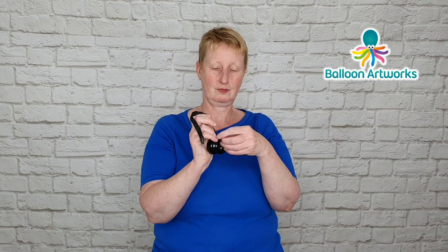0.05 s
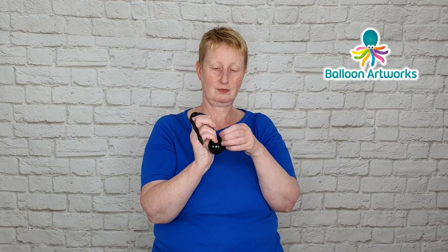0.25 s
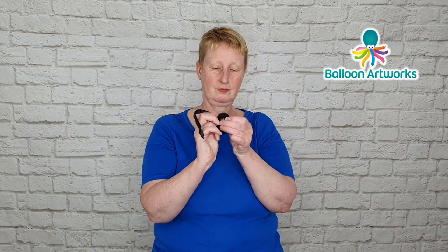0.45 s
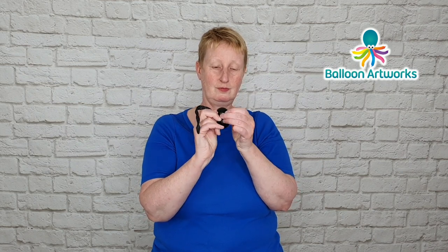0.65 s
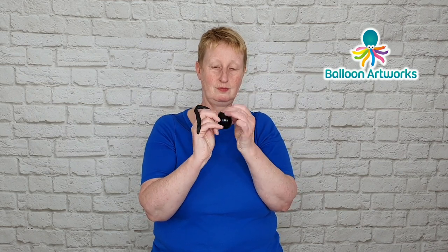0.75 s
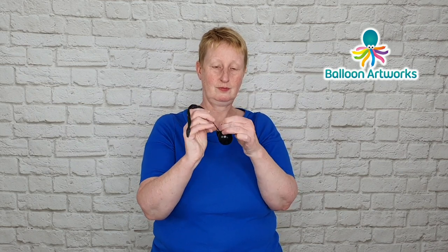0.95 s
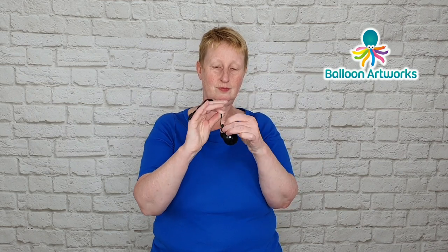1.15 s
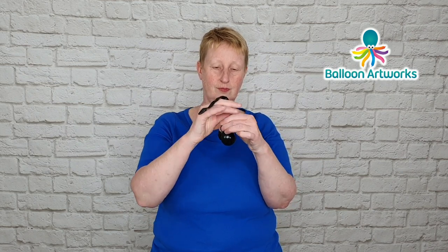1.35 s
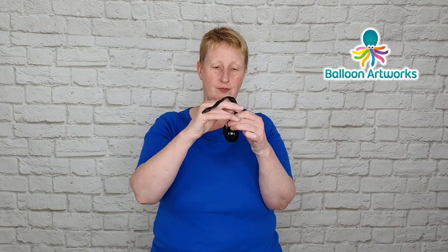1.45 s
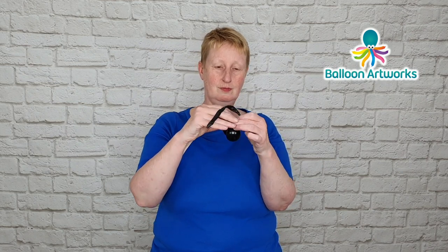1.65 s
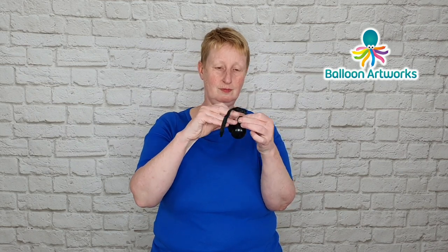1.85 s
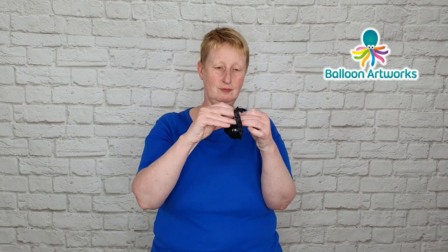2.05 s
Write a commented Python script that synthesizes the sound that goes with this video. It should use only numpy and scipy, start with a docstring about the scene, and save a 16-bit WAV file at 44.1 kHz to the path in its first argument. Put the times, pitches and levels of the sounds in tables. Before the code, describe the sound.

A small latex balloon is knotted by hand, creaking and hissing, with one loud sharp snap

```python
"""Fingers knot and twist a small latex balloon in a bare room, over faint room tone and rumble.
From the start the skin hisses as it slides, and sticks and slips: creaks (runs of quick slips) and lone ticks
ring the taut skin and the air inside. A loud snap just before half a second is a push of air, a shudder and a rip.
Short pitched squeaks and bumps follow from 0.76 s, and airy rubs of band noise from 1.45 s.
A mono microphone with a peak limiter listens from a couple of metres, with the echoes of the room."""
import sys
import numpy as np
from scipy import signal
from scipy.fft import rfft, irfft
from scipy.io import wavfile
from scipy.ndimage import uniform_filter1d, minimum_filter1d

SR = 44100
rng = np.random.default_rng(int(sys.argv[2]) if len(sys.argv) > 2 else 0)


def wav_record(signal):
    """Record a signal, one row per channel, as 16-bit PCM in the file named by sys.argv[1]."""
    frames = np.transpose(np.atleast_2d(signal))
    bounded = np.clip(frames, -1, 1)
    # unit amplitude maps onto the largest positive 16-bit level
    quanta = np.round(bounded * 32767).astype(np.int16)
    wavfile.write(sys.argv[1], SR, quanta)


N = 92610

# modes the balloon rings with: pitch_hz [Hz], level_db [dB], t60_s [s]
SKIN_MODES = [(421, -8.5, 0.034), (636, -5.5, 0.022), (898, -8.5, 0.019), (1069, -7, 0.026),
              (1446, -7, 0.018), (1696, -6.5, 0.015), (2156, -3.5, 0.0095), (2667, -3.5, 0.00685),
              (3222, -0.5, 0.0058), (4115, 1.5, 0.002), (5780, -6.5, 0.0036), (6944, -4, 0.0029),
              (8110, -1.5, 0.0023), (12380, -8.5, 0.001)]
COLOUR_CENTRE_HZ = 1750   # brightness tilts the mode levels about this pitch


def amp(db):
    """dB to gain."""
    return 10 ** (np.asarray(db) / 20)


def unit(x):
    """Scale to rms 1."""
    return x / np.sqrt(np.mean(x ** 2) + 1e-20)


def band_noise(low_hz, high_hz, length):
    """White noise through a band-pass filter."""
    band = signal.butter(2, [low_hz, high_hz], "band", fs=SR, output="sos")
    return signal.sosfilt(band, rng.standard_normal(length))


def ring(x, hz, t60):
    """A damped two-pole resonance: a unit click sets a sine of height 1 ringing."""
    radius = amp(-60 / (t60 * SR))
    angle = 2 * np.pi * hz / SR
    return signal.lfilter([0, np.sin(angle)], [1, -2 * radius * np.cos(angle), radius ** 2], x + 1e-18)


def swell(x, hz, t60):
    """A ring that builds up over its first moments: a broader resonance of gain 1 comes first."""
    rise_share = 0.084   # decay time of the broad resonance over that of the ring
    radius = amp(-60 / (t60 * rise_share * SR))
    angle = 2 * np.pi * hz / SR
    zeros = [(1 - radius ** 2) / 2, 0, (radius ** 2 - 1) / 2]
    broad = signal.lfilter(zeros, [1, -2 * radius * np.cos(angle), radius ** 2], x + 1e-18)
    return ring(broad, hz, t60)


def floor(handling):
    """Steady room tone over a low, lumpy rumble that swells with the handling."""
    # spectrum of the room tone: pitch_hz [Hz], level_db [dB, relative]
    tone_shape = [(30, -70), (345, -5), (486, -21), (1760, -24.5), (16000, -38)]
    tone_db, rumble_db, lump_db = -64, -72.5, 4
    shake_db = -32.5   # rumble stirred up by the handling, relative to its level
    busy = np.sqrt(np.maximum(uniform_filter1d(handling ** 2, size=1500), 0))
    hz, db = np.transpose(tone_shape)
    log_hz = np.log(np.fft.rfftfreq(N, 1 / SR) + 1)
    tone = irfft(rfft(rng.standard_normal(N)) * amp(np.interp(log_hz, np.log(hz), db)), N)
    rumble = unit(band_noise(40, 129, N))
    lumps = np.interp(np.arange(N), np.linspace(0, N, 30), rng.standard_normal(30))
    rumble_gain = (amp(rumble_db) + amp(shake_db) * busy) * amp(lump_db * lumps)
    return amp(tone_db) * unit(tone) + rumble_gain * rumble


def catches():
    """Skin catching on skin: a random train of tiny clicks of either sign and uneven strength."""
    catches_per_s, spread_db = 8100, 2.5
    happens = rng.random(N) < catches_per_s / SR
    strength = amp(spread_db * np.minimum(rng.exponential(1, N), 4))
    return happens * strength * rng.choice([-1, 1], N)


def slide():
    """Sliding skin hisses: thousands of tiny catches a second ring the modes, damped by the fingers."""
    # the slide over time: time_s [s], level_db [dB], brightness [dB per octave]
    strokes = [(0, -49, 7), (0.054, -44.5, 4), (0.099, -38, 5.5), (0.146, -46, 7), (.16, -58.5, -0.5),
               (0.231, -41, 5), (.34, -34, 0.5), (0.421, -33.5, -0.5), (.7, -42.5, -1), (.94, -52, 1.5),
               (1.05, -45, -1.5), (1.13, -56, 0.5), (1.27, -62, 1.5), (1.32, -52, -1.5), (1.42, -51.5, 3),
               (1.49, -55, 3), (1.6, -51, 1.5), (1.641, -70, 0.5), (1.82, -60, 0.5), (1.87, -55, 6.5),
               (1.89, -43.5, 2), (1.95, -56.5, 6), (1.991, -42, 1), (2.005, -67, 6.5), (2.1, -48, -7)]
    wander_db = 5   # each mode swells and fades as the grip shifts
    time_s, level_db, brightness = np.transpose(strokes)
    t = np.arange(N) / SR
    level_db = np.interp(t, time_s, level_db)
    brightness = np.interp(t, time_s, brightness)
    trains = [catches(), catches()]   # the modes take turns between the two
    knots = np.linspace(0, N, 60)
    wander = wander_db * rng.standard_normal(size=(len(SKIN_MODES), len(knots)))
    rings = 0
    for k, (hz, mode_db, t60) in enumerate(SKIN_MODES):
        grip_db = np.interp(np.arange(N), knots, wander[k])
        tilt_db = brightness * np.log2(hz / COLOUR_CENTRE_HZ)
        rings = rings + amp(mode_db + grip_db + tilt_db) * ring(trains[k % 2], hz, t60 * 0.7)
    return amp(level_db) * unit(rings)


def creak_slips():
    """Each creak is a run of slips whose gap and strength glide from first to last."""
    # creaks: start_s [s], end_s [s], first_gap_ms [ms], last_gap_ms [ms], first_db [dB], last_db [dB],
    # brightness [dB per octave], narrowness [dB per octave squared]
    creaks = [(.004, 0.048, 10.88, 11, -39, -34.5, 6, 2.5), (0.168, 0.202, 15.2, 13, -36, -40, 1.5, 0.5),
              (1.0046, 1.048, 11.7, 6.62, -37, -31.5, 0, 0.5), (1.054, 1.093, 11, 7.6, -35, -45.5, 2.5, 6),
              (1.735, 1.817, 19.7, 18.2, -49.5, -48, 1, 1), (0.2145, 0.239, 5.47, 5.16, -30, -29, -3, 2),
              (0.2425, 0.278, 3.8, 6.26, -11, -16, 1, 2), (0.2983, 0.324, 4.6, 3.0, -17, -18.5, -0.5, 2),
              (1.3635, 1.376, 4.1, 3.9, -40, -49, 1.5, 0.5), (1.4958, 1.515, 5.2, 5.1, -38, -36, -2, 2)]
    jitter_db = 0.5
    rows = []
    for start, end, first_gap, last_gap, first_db, last_db, brightness, narrowness in creaks:
        s = start
        while s < end:
            done = (s - start) / (end - start)
            level_db = first_db + (last_db - first_db) * done + jitter_db * rng.normal()
            rows.append((s, level_db, brightness, narrowness))
            s += (first_gap + (last_gap - first_gap) * done) / 1000
    return rows


def slips():
    """Every slip, lone or in a creak, strikes all modes, each at its own instant and in the slip's colour."""
    # lone slips: time_s [s], level_db [dB], brightness [dB per octave], narrowness [dB per octave squared]
    lone_slips = [(0.0629, -28.5, 1, 1), (0.0686, -32.5, -0.5, 3), (0.2385, -20, 3, 2),
                  (0.29, -19, 1, -0.5), (0.416, -44.5, 0, 19), (0.4331, -28, -1, -2.5),
                  (0.4384, -19.5, 2, 0.5), (0.4629, -15, 4.5, 2), (0.6666, -30.5, 3.5, 0),
                  (0.6972, -30.5, 6, 5), (0.7442, -36, 10, 2), (0.7633, -30.5, 9.5, 3.5),
                  (0.8368, -31, 7.5, 4), (0.8959, -37.5, 0, -1), (0.9229, -34.5, -0.5, 5),
                  (0.966, -33.5, 0.5, 1), (0.981, -33.5, 1.5, 1), (0.9934, -30, 6.5, 9),
                  (1.3799, -35.5, 3, 0.5), (1.385, -39.5, 4.5, 1), (1.453, -36, 0.5, 4.5),
                  (1.4806, -56, 15, 1), (1.4969, -64.5, 32.5, 6.5), (1.4897, -36, -0.5, 2.5),
                  (1.5421, -35, 4, 25), (1.855, -36.5, 0.5, -2.5), (1.9896, -41.5, 3.5, -1.5),
                  (2.0291, -38.5, 0.5, 0.5), (2.039, -34.5, -4, -1.5), (2.056, -46.5, 14, 6),
                  (2.0873, -28.5, -2, 0.5), (2.0946, -35.5, 3, 0)]
    scatter_db, tear_ms = 2.5, 0.5   # a slip reaches the modes over the tear time
    # during the hard twist the middle modes are held quiet
    pinch_start_s, pinch_end_s, pinch_low_hz, pinch_high_hz, pinch_db = 0.2, 0.335, 980, 1900, -7
    s, level_db, brightness, narrowness = np.transpose(lone_slips + creak_slips())
    scatter = scatter_db * rng.normal(0, 1, size=(len(s), len(SKIN_MODES)))
    late = rng.random(size=(len(s), len(SKIN_MODES)))
    out = 0
    for k, (hz, mode_db, t60) in enumerate(SKIN_MODES):
        octave = np.log2(hz / COLOUR_CENTRE_HZ)
        colour_db = brightness * octave - narrowness * octave ** 2
        gain = amp(level_db + mode_db + colour_db + scatter[:, k])
        if pinch_low_hz < hz < pinch_high_hz:
            gain = gain * amp(pinch_db * (s > pinch_start_s) * (s < pinch_end_s))
        force = np.zeros(N + SR)
        strike = ((s + (late[:, k] - 1) * tear_ms / 1000) * SR).astype(int)
        np.add.at(force, strike, gain * (-1) ** k)   # neighbouring modes start in opposite directions
        out = out + swell(force[:N], hz, t60)
    return out


def room(x):
    """Diffuse echoes: half-octave bands of noise swell in and die at their own rates, over near echoes."""
    # echoes by pitch: pitch_hz [Hz], level_db [dB, before the swell], t60_s [s]
    echo_table = [(100, -13.5, 0.68), (415, -8, 0.62), (1520, -6.5, 0.5), (3920, -10, 0.512),
                  (12000, -11.5, 0.2)]
    gap_s, swell_s = 0.0051, 0.0069
    near_db, near_t60_s = -10.5, 0.047   # echoes off hands and chest
    t, tail = np.arange(SR) / SR, 0
    hz, db, t60 = np.transpose(echo_table)
    for low in 80 * 2.0 ** np.arange(0, 7.6, .5):
        band = band_noise(low, low * np.sqrt(2), SR)
        log_centre = np.log(low) + np.log(2) / 4
        decay = amp(-60 * t / np.interp(log_centre, np.log(hz), t60))
        level = amp(np.interp(log_centre, np.log(hz), db))
        tail = tail + level * band * decay / np.sqrt((decay ** 2).sum())
    tail = tail * (1 - np.exp(-np.maximum(t - gap_s, 0) / swell_s))
    near = rng.standard_normal(SR) * amp(-60 * t / near_t60_s)
    tail = tail + amp(near_db) * near / np.sqrt((near ** 2).sum())
    return signal.fftconvolve(x, tail)[:N]


def snap():
    """The twisted neck jumps free: a push of air, a shudder of the whole bubble and a short rip."""
    # shudder of the bubble: pitch_hz [Hz], level_db [dB], t60_s [s]
    shudder_modes = [(394, 1, 0.018), (1418, -0.5, 0.019)]
    snap_s, push_db, push_ms = 0.4756, 9.5, 0.072
    rip_db, rip_ms, rip_hz = -4.5, 3.65, 2424
    ms = np.maximum(np.arange(N) / SR - snap_s, 0) * 1000
    push = ms / push_ms * np.exp(1 - ms / push_ms)
    shudder = 0
    for hz, db, t60 in shudder_modes:
        decay_db = .06 * ms / t60   # 60 dB per t60, with time in ms
        shudder = shudder - np.sin(2 * np.pi * hz * ms / 1000) * amp(db - decay_db)
    # one-pole low-passed noise
    rip = unit(signal.lfilter([1], [1, -np.exp(-2 * np.pi * rip_hz / SR)], rng.standard_normal(N)))
    rip = rip * (ms > push_ms) * np.exp(-(ms / rip_ms) ** 4)
    return amp(push_db) * push + shudder + amp(rip_db) * rip


def squeaks():
    """Each short squeak or bump is one ring on one pitch that swells in and dies."""
    # squeaks and bumps: time_s [s], peak_db [dB], pitch_hz [Hz]
    squeak_table = [(.763, -24, 1750), (.79, -22.5, 1710), (0.8725, -34.5, 1700), (1.8553, -31.5, 720),
                    (1.8805, -41, 405), (2.0875, -28.5, 1070)]
    t60_s = 0.01615
    out = 0
    for s, peak_db, hz in squeak_table:
        click = 1.0 * (np.arange(N) == int(s * SR))
        ringing = swell(click, hz, t60_s)
        out = out + amp(peak_db) * ringing / np.abs(ringing).max()
    return out


def rubs():
    """Airy rubs: a band of noise around one pitch under a half-sine stroke."""
    # rubs: start_s [s], end_s [s], level_db [dB], centre_hz [Hz]
    rub_table = [(1.454, 1.5, -53.5, 8090), (1.827, 1.863, -54.5, 5960), (1.871, 1.94, -49, 4170),
                 (1.952, 2.008, -52.5, 4270)]
    half_width = 0.15   # as a share of the centre
    out, t = 0, np.arange(N) / SR
    for start, end, db, hz in rub_table:
        hiss = unit(band_noise(hz * (1 - half_width), hz * (1 + half_width), N))
        stroke = np.sin(np.pi * np.clip((t - start) / (end - start), 0, 1))
        out = out + amp(db) * stroke * hiss
    return out


def scene():
    """Balloon, its echoes and the room tone, the same in both channels."""
    mic_low_hz, mic_high_hz = 152, 10200
    balloon = slips() + slide() + snap() + rubs()
    balloon = signal.sosfilt(signal.butter(2, mic_high_hz, fs=SR, output="sos"), balloon)
    balloon = signal.lfilter(*signal.butter(1, mic_low_hz, "high", fs=SR), balloon)
    squeaking = squeaks()
    # the squeaks face the microphone and stir the room less
    heard = balloon + squeaking + room(balloon + .5 * squeaking)
    return np.tile(heard + floor(heard), (2, 1))


def record(dry):
    """A look-ahead limiter ducks peaks over the ceiling and recovers quickly; the top is cut."""
    ceiling_db, release_db_per_s, attack_ms = 0, 706.5, 0.41
    clip_level, cutoff_hz = 1, 16200
    over_db = np.maximum(20 * np.log10(np.abs(dry[0]) + 1e-9) - ceiling_db, 0)
    ramp = release_db_per_s * np.arange(N) / SR
    held_db = np.maximum.accumulate(over_db + ramp) - ramp   # falls back at the release rate
    lead = int(attack_ms * SR / 1000)
    widest_db = -minimum_filter1d(-held_db, size=2 * lead + 1)   # acts ahead of each peak
    cut_db = uniform_filter1d(widest_db, size=2 * lead + 1)
    limited = np.clip(dry * amp(-cut_db), -clip_level, clip_level)
    return signal.sosfilt(signal.cheby2(12, 70, cutoff_hz, fs=SR, output="sos"), limited)


dry = scene()
out = record(dry)
wav_record(out)
```